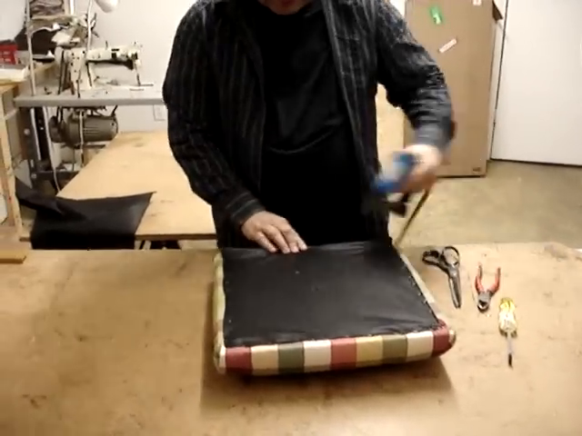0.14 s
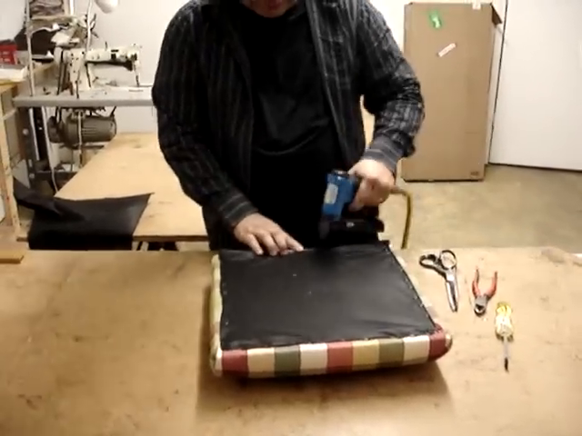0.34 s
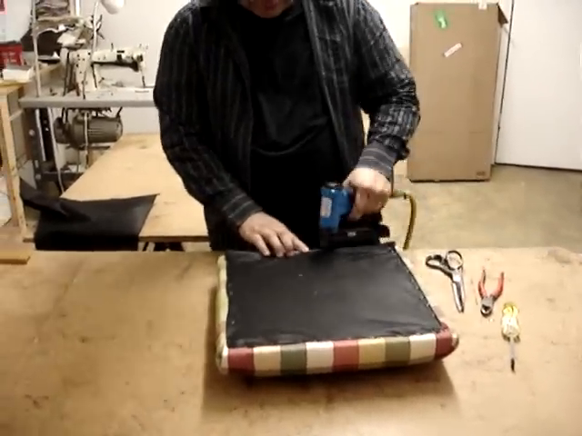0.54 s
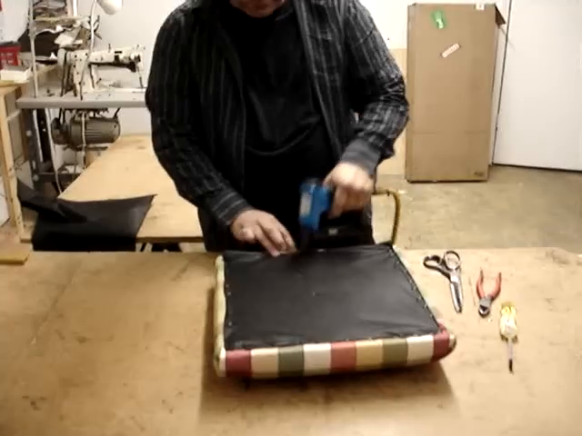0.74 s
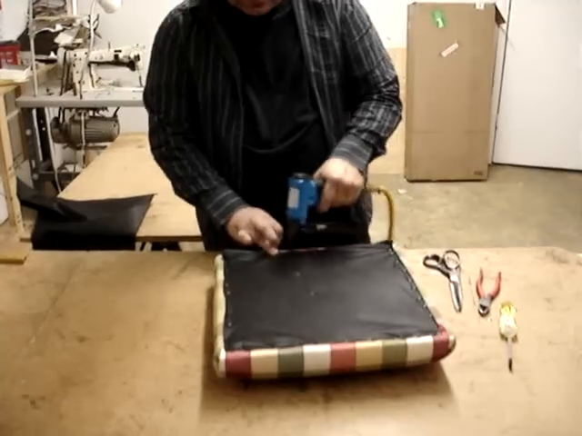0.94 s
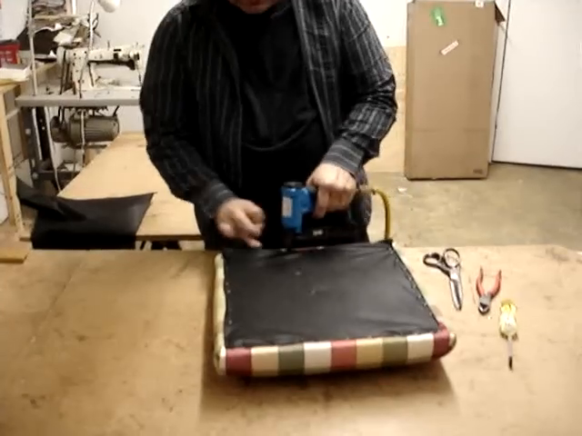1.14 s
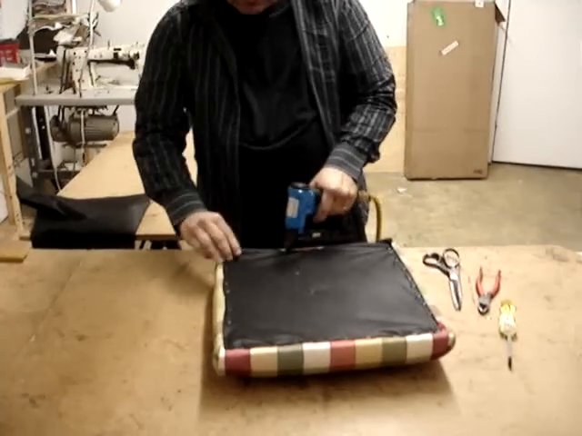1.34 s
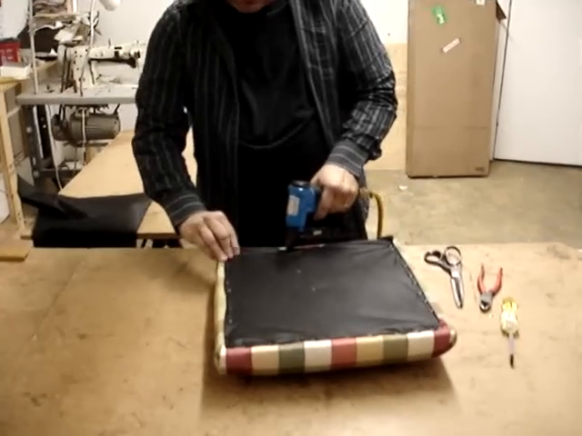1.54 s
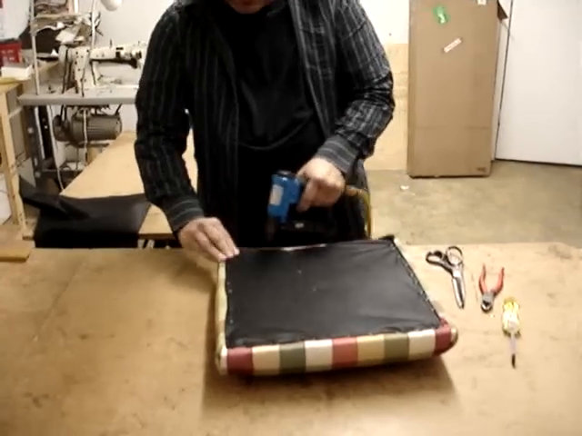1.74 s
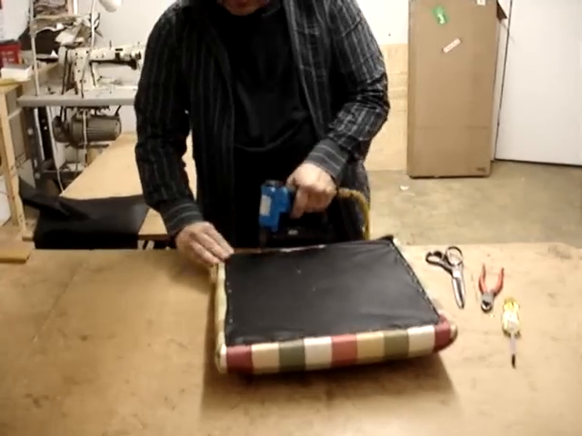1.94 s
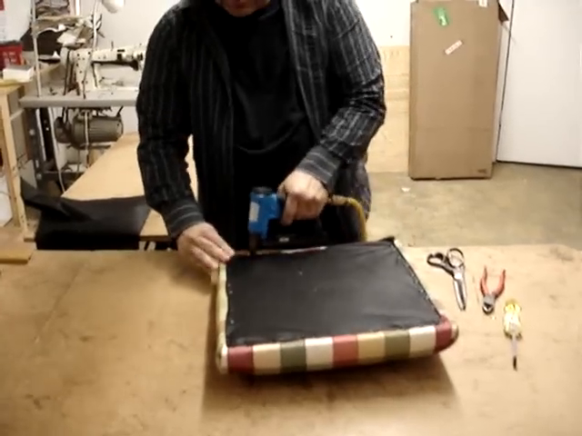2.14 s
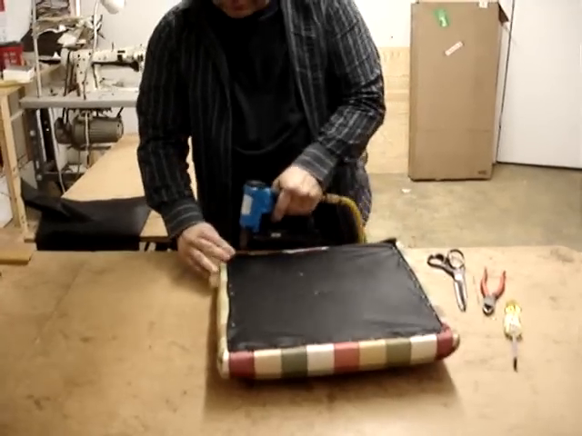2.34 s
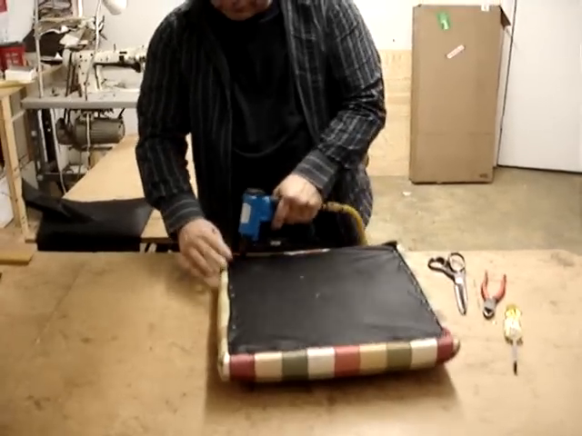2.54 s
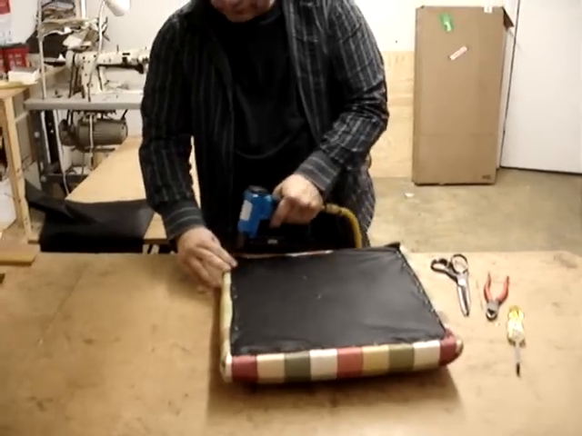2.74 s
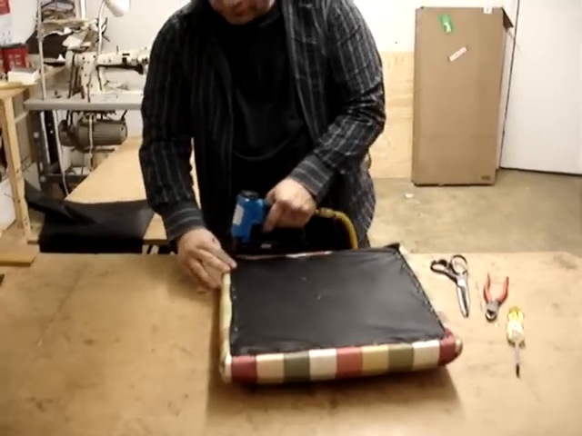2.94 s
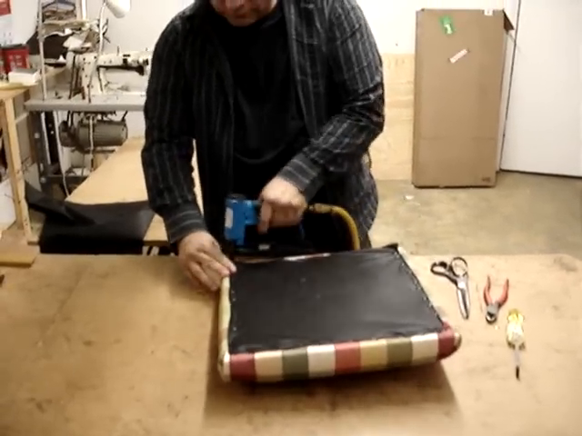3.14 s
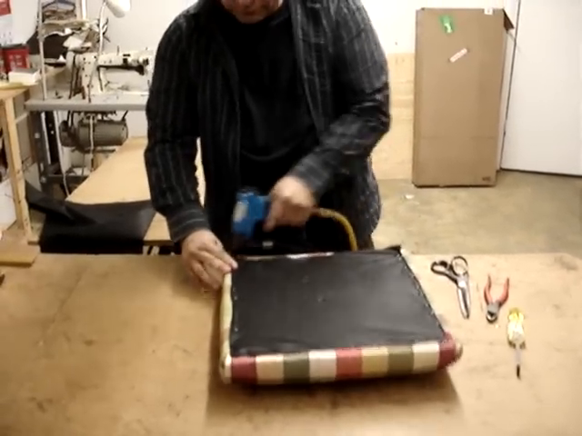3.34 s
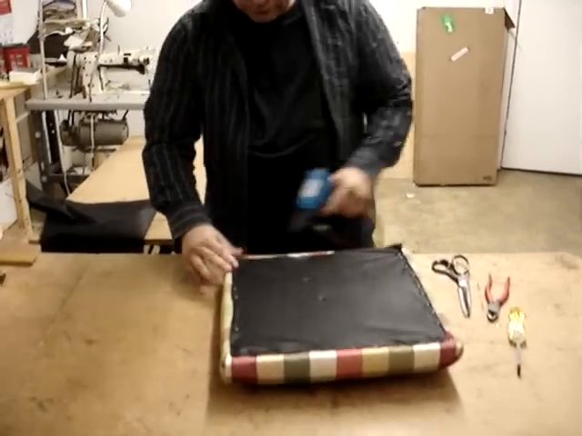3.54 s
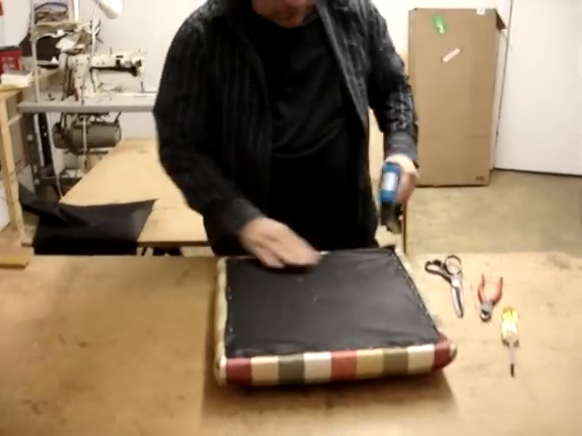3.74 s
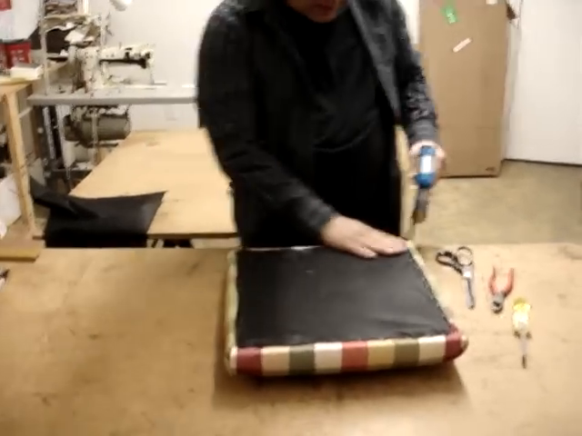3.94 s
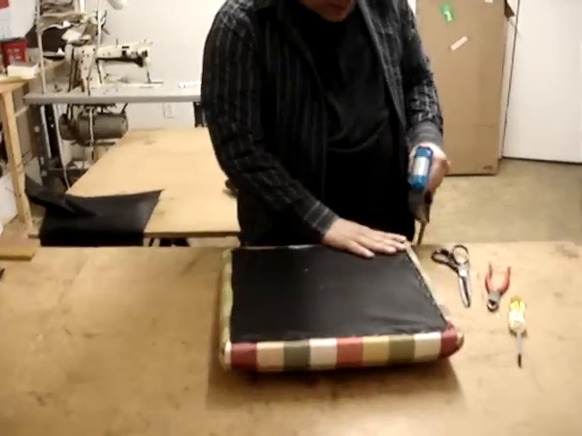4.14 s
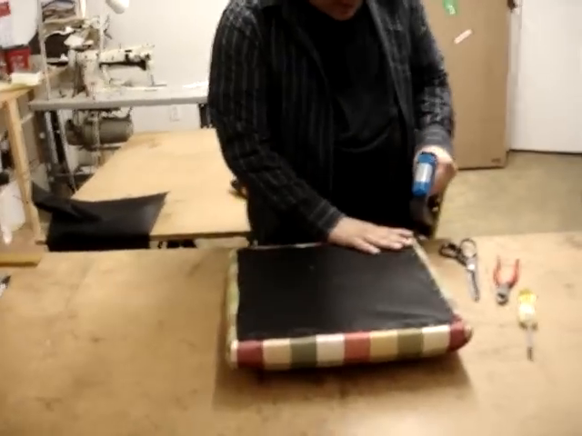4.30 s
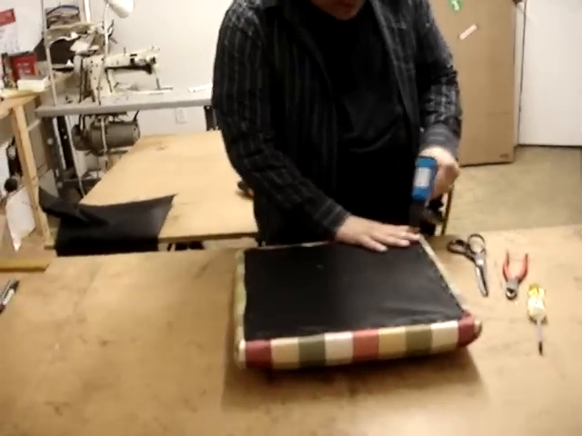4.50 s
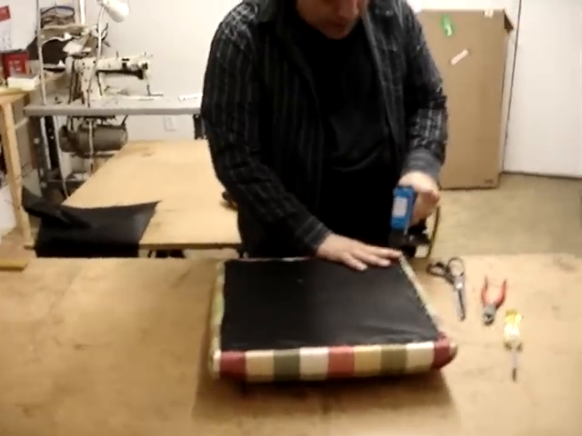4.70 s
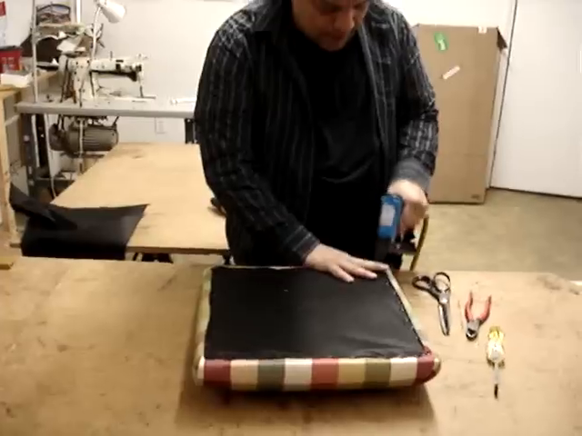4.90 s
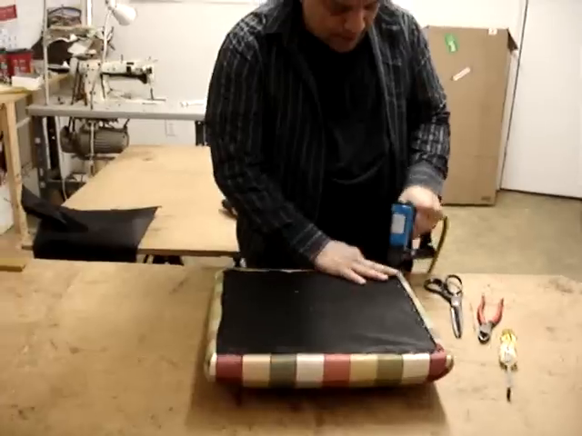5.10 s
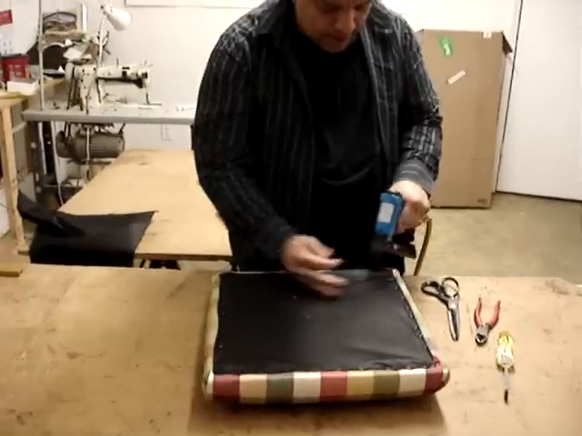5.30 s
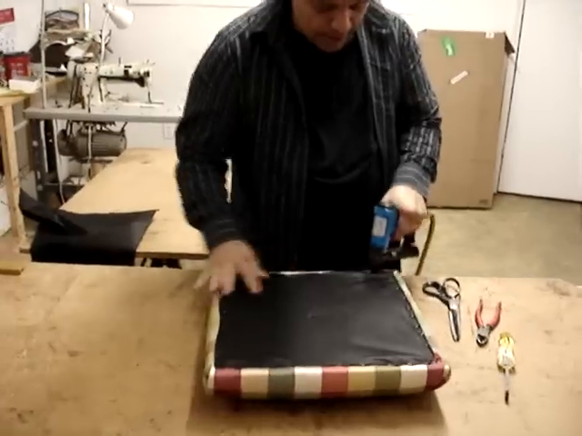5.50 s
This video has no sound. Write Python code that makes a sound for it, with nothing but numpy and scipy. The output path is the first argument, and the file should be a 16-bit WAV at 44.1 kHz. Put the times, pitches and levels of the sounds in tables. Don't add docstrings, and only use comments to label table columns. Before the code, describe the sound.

A pneumatic stapler knocks and cracks in hard double snaps with short air hisses, nine shots over a faint workshop hum.

```python
import sys
import numpy as np
from scipy import signal
from scipy.fft import rfft, irfft
from scipy.io import wavfile
from scipy.ndimage import uniform_filter1d, minimum_filter1d

SR = 44100
rng = np.random.default_rng(int(sys.argv[2]) if len(sys.argv) > 2 else 0)


def dump_mix(stems):
    frames = np.atleast_2d(stems).T
    limited = np.clip(frames, -1, 1)
    pcm = np.round(limited * 32767).astype(np.int16)
    wavfile.write(sys.argv[1], SR, pcm)


def rack_gain(trim_db):
    fader = np.asarray(trim_db, float)
    return 10 ** (fader / 20)


N = 249606
T = np.arange(N) / SR

# start_s, slam_db, slam_ring_hz, rebound_db, room_db
SHOTS = [
    (0.6291, -4, 2050, -5.5, -21.5),
    (0.9007, -4, 1860, -3, -29.5),
    (1.1609, -7.5, 1900, -3.5, -26),
    (1.9672, -4.5, 1910, -5.5, -19),
    (2.2462, -4, 1800, -5, -22),
    (2.529, -6.5, 1945, -4, -22),
    (3.3192, -1.5, 1800, -5.5, -19),
    (5.1051, 0, 3080, -3, -19),
    (5.5666, -2.5, 2810, -4, -22),
]
# start_s, click_db, jet_db, jet_length_ms, held_leak_db
VENTS = [
    (.7468, -3, -15.5, 23.4, -30),
    (0.993, -12, -20.5, 30, -27.5),
    (1.274, -23, -23, 11, -30),
    (2.097, -10.5, -18, 5.5, -35),
    (2.354, -11, -20, 12.4, -33.5),
    (2.625, -31, -21.5, 5.2, -32),
    (3.3973, -6.5, -19.5, 10.4, -53),
    (5.2043, -8, -19.5, 37, -35.5),
]
# start_s, peak_db, wood_db, knock_ring_hz, room_db
BUMPS = [
    (0.5945, 2, -17.5, 1510, -17),
    (0.8707, -1.5, -19.5, 1130, -21.5),
    (1.1164, -3.5, -21.5, 1220, -23.5),
    (1.9247, -49.5, -28, 876, -43),
    (2.2175, -14.5, -24, 1490, -32.5),
    (2.488, -20, -25, 1017, -36.5),
    (4.7938, -17.5, -31.5, 1100, -36),
    (5.056, -15.5, -24, 1390, -30.5),
    (5.5284, -10, -21.5, 1020, -27),
]
# start_s, rise_s, hold_s, rustle_db, rub_db
HAND = [
    (3.8, .12, 0.16, -63.5, -62),
    (4.1, .45, 0.31, -62, -65),
    (4.796, .02, 0.022, -64, -70),
]
# mode_hz, level_db, t60_s
FRAME_MODES = [(253.8, -1, 0.044), (335, -2, 0.057), (483.4, -6, 0.013), (560.7, -20.5, 0.12),
               (809.4, -17.5, 0.035), (820, 2, 0.11), (1253.7, -6.5, 0.06)]
# mode_hz, level_db, t60_s
SEAT_MODES = [(238.3, -4.5, 0.13), (300.7, -3.5, 0.13), (460, -8.5, 0.023), (763, -6, 0.045),
              (1240, -6.5, .02), (1700, -21.5, 0.0092)]
# mode_hz, level_db, t60_s
BODY_MODES = [(1470, -5.5, 0.029), (2140, -8, 0.023), (2320, 1.5, 0.0049), (3070, 1, .015),
              (4630, -15, 0.024), (5400, -14, .015), (7600, -18, .02)]
# freq_hz, density_db
JET_SPECTRUM = [(59, -48), (100, -16), (370, -7.5), (564, -0.5), (985, -9.5), (1340, -4.5), (2680, -1.5),
                (2890, -4), (3250, -3), (9900, -10.5), (12900, -35.5), (21800, -120)]
# freq_hz, density_db
LEAK_SPECTRUM = [(150, -38), (300, -7.5), (900, -9.5), (2000, -4), (2450, 0), (3000, -1.5), (3600, -8.5),
                 (5000, -10.5), (10000, -28)]
# centre_hz, width_hz, level_db
PORTS = [(1856, 55, -5), (2445, 160, -4), (2685, 53, -1.5), (3130, 90, -2)]
# freq_hz, level_db
CRACK_SPECTRUM = [(120, -27.5), (200, -15.5), (330, 2.5), (600, -18.5), (850, 3), (1300, -4), (2500, -2.5),
                  (4000, -5.5), (6500, -13.5), (10000, -24)]
# freq_hz, level_db
THUD_SPECTRUM = [(120, -8), (230, -7), (500, -3.5), (1100, -3), (1800, -8.5), (3000, -15.5), (5500, -15),
                 (10000, -25.5)]
# freq_hz, t60_s
ROOM_T60 = [(100, 0.16), (260, 0.24), (700, .41), (1840, 0.51), (4850, 0.45), (10000, 0.27)]
# freq_hz, level_db
ROOM_COLOUR = [(100, -4.5), (300, 7.5), (1000, 3), (3000, -4.5), (6000, 4.5), (10000, 1.5)]
# delay_ms, level_db
ECHOES = [(10.5, -9.5), (17, -14.5), (27, -16.5)]
# freq_hz, density_db
AIR_SPECTRUM = [(18, -44), (30, -5.5), (190, -10.5), (348, -14), (393, -10), (443, -4.5), (686, -13.5),
                (756, -5.5), (896, -12), (2610, -15.5), (9900, -30.5), (12900, -63.5), (21800, -120)]
# multiple, level_db
MOTOR_PARTIALS = [(5, -59), (6, -62), (7, -51), (8, -64), (9, -52.5), (10, -58.5), (11, -56.5), (12, -61.5),
                  (13, -62), (14, -64.5), (15, -60), (16, -63.5)]
# multiple, level_db
BALLAST_PARTIALS = [(8, -67.5), (9, -65.5), (11, -63.5), (12, -73.5), (14, -65.5), (17, -69), (18, -71),
                    (19, -63), (20, -66.5), (21, -70), (22, -63.5), (23, -74.5), (27, -72.5)]
# freq_hz, density_db
PREAMP_SPECTRUM = [(15, -41), (25, 2), (250, -11.5), (298, -12.5), (445, -13.5), (896, -20), (1270, -19),
                   (1520, -27), (9900, -24.5), (12900, -59.5), (21800, -120)]

AIR_DB, MOTOR_HZ, BALLAST_HZ = -49, 49.76, 121.2
PREAMP_DB, MAINS_DB = -60.5, -67
LAST_LEAK_DB, PORTS_DB = -32, -10
SWELL_MS, SWELL_MS_PER_DB = 0.6, 0.1743
REBOUND_LAG_S, LAG_S_PER_HZ = 0.0046, 0.57e-6
HAND_T60_S = 1.3
START_GAIN_DB, DUCK_DB, DUCK_S = 0.74, 12.5, 0.16
HELD_DB, CREEP_DB, CREEP_S = -17.5, 6.5, 0.8
FRAME_S, FRAME_START_S = 0.036, 0.013
BAND_LIMIT_HZ = 10020


def at_hz(points, hz):
    table = np.array(points)
    return np.interp(np.log(np.maximum(hz, 1)), np.log(table[:, 0]), table[:, 1])


def coloured(spectrum, size=N):
    hz = np.fft.rfftfreq(size, 1 / SR)
    white = rfft(rng.standard_normal(size))
    noise = irfft(white * rack_gain(at_hz(spectrum, hz)), size)
    return noise / noise.std()


def drift(rate_hz):
    knots = rng.standard_normal(int(T[-1] * 60) + 2)
    return np.interp(T * rate_hz, np.arange(len(knots)), knots)


def butter(x, order, hz, kind="low"):
    return signal.sosfilt(signal.butter(order, hz, kind, fs=SR, output="sos"), x)


def clicks(at_s, db):
    train = np.full(N, 1e-18)
    train[np.round(np.asarray(at_s) * SR).astype(int)] = rack_gain(db)
    return train


def ring(x, hz, t60_s):
    r, w = rack_gain(-60 / (t60_s * SR)), 2 * np.pi * hz / SR
    return signal.lfilter([0, np.sin(w)], [1, -2 * r * np.cos(w), r * r], x)


def strike(at_s, db, modes, spread_db):
    luck_db = spread_db * rng.standard_normal((len(at_s), len(modes)))
    out = np.zeros(N)
    for k, (hz, mode_db, t60_s) in enumerate(modes):
        out += ring(clicks(at_s, db + mode_db + luck_db[:, k]), hz, t60_s)
    return out


def burst(at_s, rise_s, hold_s, t60_s):
    t = T - at_s
    fall_s = np.clip(t - rise_s - hold_s, 0, 2)
    return np.clip(t / rise_s, 0, 1) ** 2 * rack_gain(-60 * fall_s / t60_s)


def snap(at_s, db, hz, cycles):
    t = np.clip(T - at_s, 0, 0.05)
    return rack_gain(db) * np.sin(2 * np.pi * hz * t) * np.exp(-(t * hz / cycles) ** 2)


def half_octaves(size, low_hz, octaves):
    white = rng.standard_normal((2, size))
    edges = low_hz * 2 ** np.arange(0, octaves, 0.5)
    for k, (low, high) in enumerate(zip(edges, edges[1:])):
        yield np.sqrt(low * high), butter(white[k % 2], 2, [low, high], "band")


def hum(base_hz, partials, waver_db):
    out = np.zeros(N)
    for multiple, db in partials:
        level = np.sqrt(2) * rack_gain(db + waver_db * drift(8.3))
        out += level * np.sin(2 * np.pi * (multiple * base_hz * T + rng.random()))
    return out


def background():
    air = rack_gain(AIR_DB + 1.4 * drift(8)) * coloured(AIR_SPECTRUM)
    return air + hum(MOTOR_HZ, MOTOR_PARTIALS, 0.5) + hum(BALLAST_HZ, BALLAST_PARTIALS, 0.62)


def camera_gain_db():
    loud_s = np.sort([BUMPS[0][0]] + [row[0] for row in [*SHOTS, *VENTS]])
    since_s = T - loud_s[np.maximum(np.searchsorted(loud_s, T) - 1, 0)]
    after_s = np.maximum(since_s, 0)
    creep_db = CREEP_DB * (1 - np.exp(-after_s / CREEP_S))
    duck_db = DUCK_DB * np.exp(-after_s / DUCK_S)
    return np.where(since_s < 0, START_GAIN_DB, HELD_DB + creep_db - duck_db)


def workshop(x):
    size = int(0.7 * SR)
    t, tail = np.arange(size) / SR, 0
    for hz, band in half_octaves(size, 70, 7.6):
        tail = tail + band * rack_gain(at_hz(ROOM_COLOUR, hz) - 60 * t / at_hz(ROOM_T60, hz))
    tail = tail * np.clip((t - 0.004) / 0.032, 0, 1)
    return signal.fftconvolve(x, tail / np.sqrt(np.sum(tail ** 2)))[:N]


def afterglow(events, colour, build_s):
    at_s, room_db = np.array(events)[:, 0], np.array(events)[:, -1]
    slow = np.exp(-1 / (build_s * SR))
    power = signal.lfilter([1 - slow], [1, -slow], clicks(at_s + 0.009, 2 * room_db))
    tail = 0
    for hz, band in half_octaves(N, 100, 7.1):
        decay = rack_gain(-120 / (at_hz(ROOM_T60, hz) * SR))
        left = signal.lfilter([1], [1, -decay], power)
        tail = tail + band * np.sqrt(left) * rack_gain(at_hz(colour, hz) + 7)
    return tail


def hand():
    rustle = coloured([(800, -12), (2500, -4), (6000, 4), (9500, -18)]) * rack_gain(1.3 * drift(33))
    rub = coloured([(200, -13.5), (420, -9), (800, -20), (1600, -30.5)]) * rack_gain(3 * drift(20))
    out = np.zeros(N)
    for at, rise_s, hold_s, rustle_db, rub_db in HAND:
        brush = rack_gain(rustle_db) * rustle + rack_gain(rub_db) * rub
        out += burst(at, rise_s, hold_s, HAND_T60_S) * brush
    return out


def bumps(spit):
    s, peaks_db, wood_db, _, _ = np.transpose(BUMPS)
    knock = strike(s, wood_db, SEAT_MODES, 3) + strike(s - 0.0016, peaks_db - 17, SEAT_MODES, 3.3)
    rattle = strike(s - 0.0022, peaks_db - 28, BODY_MODES, 2)
    thud = coloured(THUD_SPECTRUM)
    for at, peak_db, _, hz, room_db in BUMPS:
        knock += snap(at, peak_db - 2.5, hz, cycles=1.1)
        knock += snap(at + 0.0005, peak_db - 12, 1.44 * hz, cycles=2.9)
        rattle += rack_gain(peak_db - 35.5) * burst(at - 0.004, 0.0037, 0, 0.064) * spit
        rattle += rack_gain(room_db - 0.5) * burst(at, 0.001, 0.0024, 0.086) * thud
    return butter(knock, 2, 2800) + rattle


def trigger_leak():
    leak = coloured(LEAK_SPECTRUM)
    sung = 0
    for hz, width_hz, db in PORTS:
        sung = sung + rack_gain(db) * np.sqrt(width_hz) * ring(leak, hz, 2.7 / width_hz)
    return (0.99 * leak + rack_gain(PORTS_DB) * sung / sung.std()) * rack_gain(1.3 * drift(55))


def vents():
    jet = coloured(JET_SPECTRUM) * rack_gain(1.2 * drift(58))
    leak = trigger_leak()
    puff = coloured([(80, -29.5), (120, -2.5), (180, -6), (300, -22)])
    out = rack_gain(LAST_LEAK_DB) * burst(SHOTS[-1][0] + 0.0036, 0.0068, 0.2, 0.1) * leak
    for (at, click_db, jet_db, length_ms, leak_db), shot in zip(VENTS, SHOTS):
        shot_s = shot[0]
        swell_s = (SWELL_MS - SWELL_MS_PER_DB * click_db) / 1000
        out += snap(at + 0.001, click_db - 2, hz=1800, cycles=1.55)
        out += rack_gain(jet_db - 11) * burst(at, 0.0057, 0.012, 0.068) * puff
        out += rack_gain(jet_db) * burst(at + 0.00077, swell_s, length_ms / 1000, 0.22) * jet
        out += rack_gain(leak_db) * burst(shot_s + 0.0062, 0.0057, at - shot_s - 0.01, 0.027) * leak
    return out


def shots(spit):
    s, slams_db, rings_hz, rebounds_db, _ = np.transpose(SHOTS)
    backs_s = s + REBOUND_LAG_S - LAG_S_PER_HZ * rings_hz
    near = strike(s - 0.0003, slams_db - 22.5, FRAME_MODES, 1.8)
    near += strike(s, slams_db - 27, BODY_MODES, 2.1)
    rebound = strike(backs_s, rebounds_db - 10.5, BODY_MODES, 2.4)
    crack = coloured(CRACK_SPECTRUM)
    for (at, db, hz, back_db, _), back in zip(SHOTS, backs_s):
        rebound += snap(back, back_db, 1900 + 0.36 * hz, cycles=1.7)
        near += snap(at, db, hz, cycles=2.6)
        near += snap(at - 0.0002, db - 14, hz=340, cycles=0.8)
        near += snap(back - 0.0006, back_db - 13, hz=366, cycles=0.58)
        near += rack_gain(-19.5) * burst(at - 0.007, 0.0056, 0.0015, 0.01) * spit
        near += rack_gain(-19) * burst(back, 0.00034, 0.00067, 0.075) * crack
    echoes = sum(rack_gain(db) * np.roll(rebound, int(ms * SR / 1000)) for ms, db in ECHOES)
    return near + rebound + echoes


def scene():
    spit = coloured([(1500, -9.5), (4000, 3.5), (8000, 1.5), (10500, -3.5)])
    shot, vent = shots(spit), vents()
    blows = butter(shot + bumps(spit), 6, 200, "high")
    bench = rack_gain(-18.5) * butter(shot, 2, 150)
    room = afterglow(SHOTS, CRACK_SPECTRUM, build_s=0.01) + afterglow(BUMPS, THUD_SPECTRUM, build_s=0.004)
    room = room + rack_gain(-9.5) * workshop(vent)
    return (rack_gain(camera_gain_db()) * background() + hand() + room + vent + bench + blows)[None]


def starve(x, depth_db, luck_db):
    _, _, z = signal.stft(x, nperseg=512)
    power = (abs(z[:256]) ** 2).reshape(32, 8, -1).sum(axis=1)
    level_db = 10 * np.log10(power + 1e-20)
    loudest_db = -minimum_filter1d(-level_db[1:].max(axis=0), size=3)
    keep = level_db + luck_db * rng.standard_normal(level_db.shape) > loudest_db - depth_db
    keep[:6] = True
    z[:256] *= np.repeat(keep, 8, axis=0)
    return signal.istft(z, nperseg=512)[1][:N]


def coarse_frames(x, depth_db, own, luck_db):
    _, s, z = signal.stft(x, SR, nperseg=256, noverlap=192)
    power = (abs(z[:128]) ** 2).reshape(32, 4, -1).sum(axis=1)
    level_db = 10 * np.log10(uniform_filter1d(power, size=5) + 1e-13)
    frame = np.floor((s - FRAME_START_S) / FRAME_S).astype(int) + 1
    loudest_db = np.full((frame[-1] + 1, 32), -200.0)
    np.maximum.at(loudest_db, frame[2:], level_db.T[:-2])
    overall_db = loudest_db[:, 1:].max(axis=1, keepdims=True)
    spared_db = 0.25 * (overall_db.max() - overall_db) + 9.8 * np.exp(-np.arange(32) / 2.3)
    floor_db = own * loudest_db + (1 - own) * overall_db - spared_db - depth_db
    luck = luck_db * rng.standard_normal((32, len(s) // 4 + 1)).repeat(4, axis=1)[:, :len(s)]
    keep = level_db + luck > floor_db[frame].T
    z[:128] *= np.repeat(keep, 4, axis=0)
    return signal.istft(z, SR, nperseg=256, noverlap=192)[1][:N]


def low_pass(x):
    return signal.sosfilt(signal.butter(12, 15800, fs=SR, output="sos"), x)


def record(dry):
    x = dry[0] + rack_gain(PREAMP_DB) * coloured(PREAMP_SPECTRUM) + hum(59.6, [(1, MAINS_DB)], 2)
    top = np.where(x > 0, 1.22, 0.56)
    x = starve(top * np.tanh(x / top), depth_db=27.5, luck_db=7.5)
    x = coarse_frames(x, depth_db=18, own=0.5, luck_db=4.5)
    x = signal.sosfilt(signal.ellip(14, 0.3, 75, BAND_LIMIT_HZ, fs=SR, output="sos"), x)
    mix = np.clip(x, -0.72, 0.72)[None]
    return low_pass(mix)


dry = scene()
out = record(dry)
dump_mix(out)
```